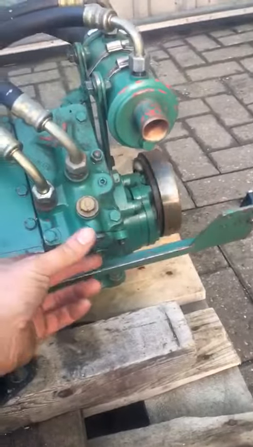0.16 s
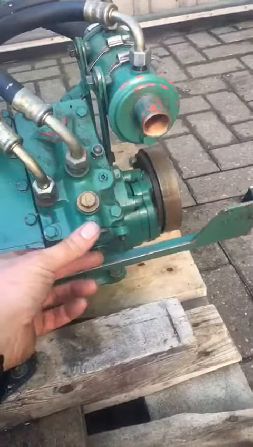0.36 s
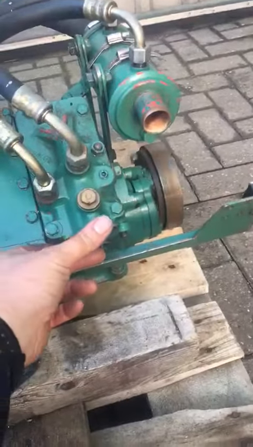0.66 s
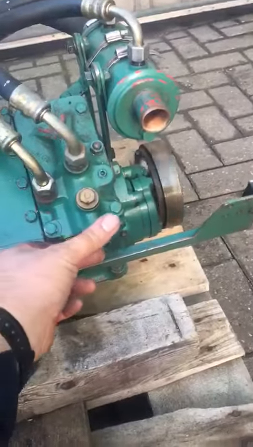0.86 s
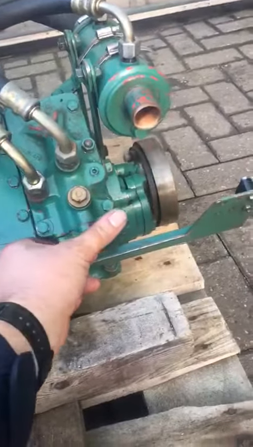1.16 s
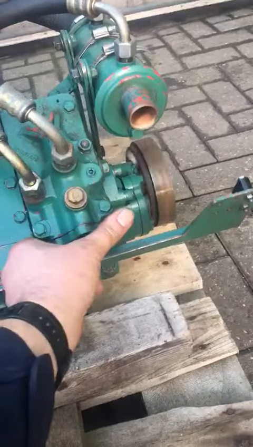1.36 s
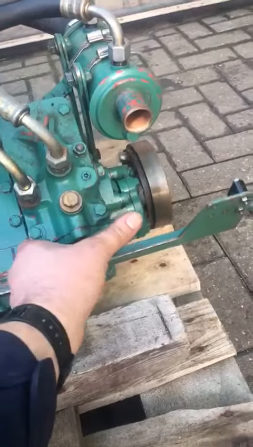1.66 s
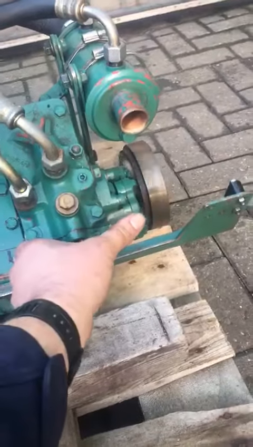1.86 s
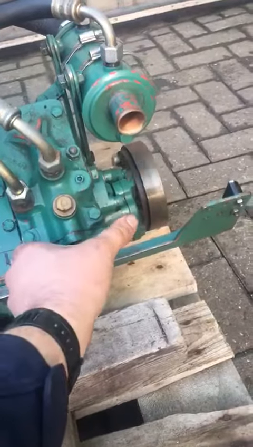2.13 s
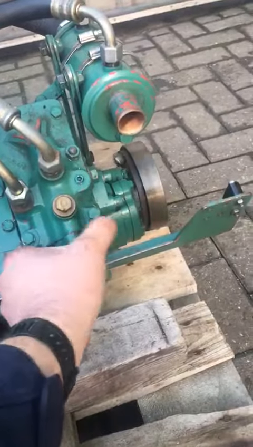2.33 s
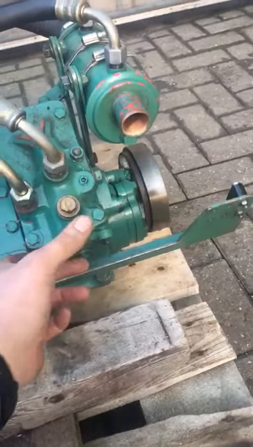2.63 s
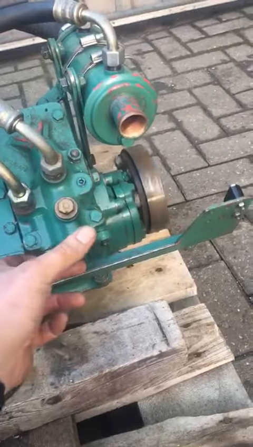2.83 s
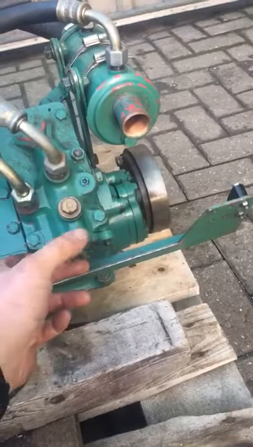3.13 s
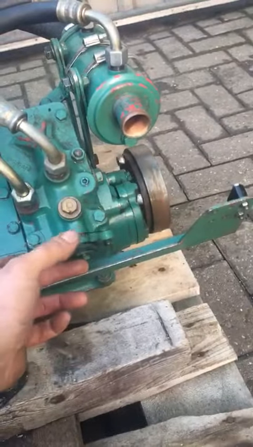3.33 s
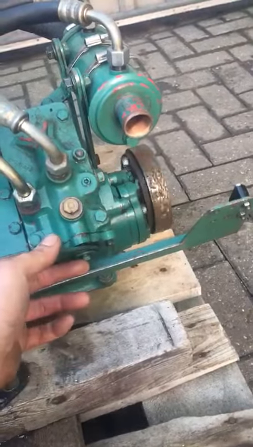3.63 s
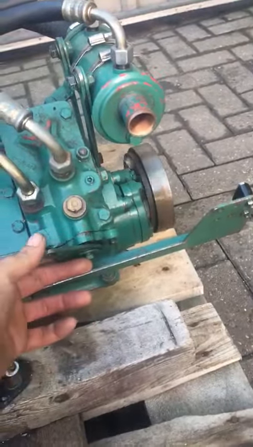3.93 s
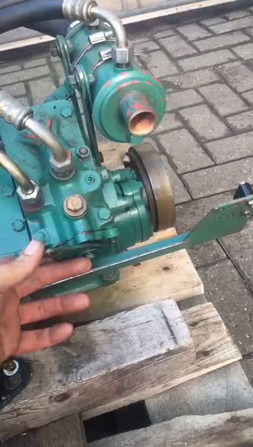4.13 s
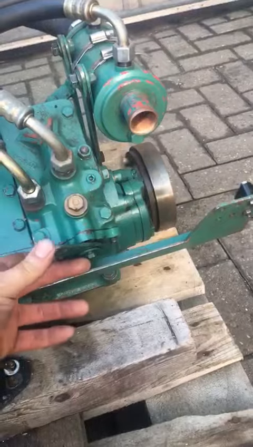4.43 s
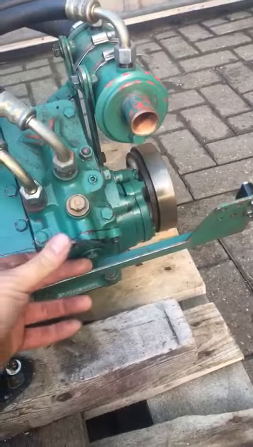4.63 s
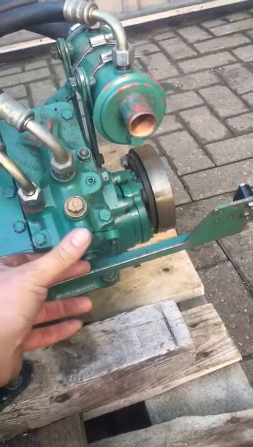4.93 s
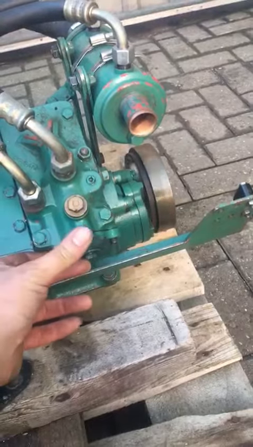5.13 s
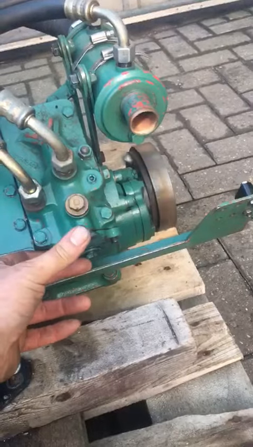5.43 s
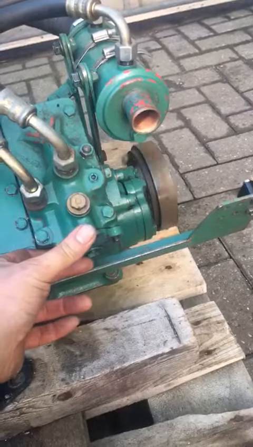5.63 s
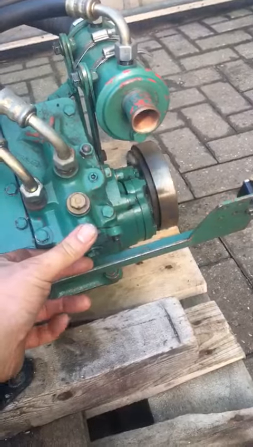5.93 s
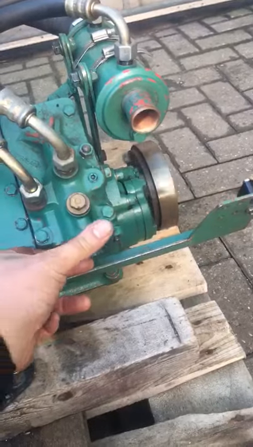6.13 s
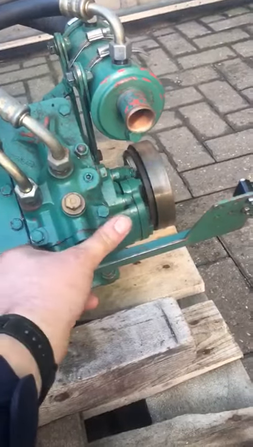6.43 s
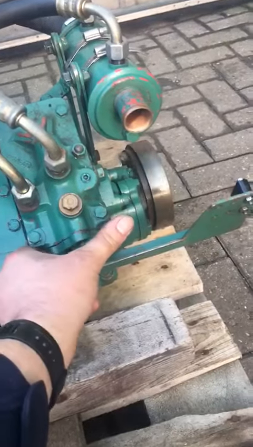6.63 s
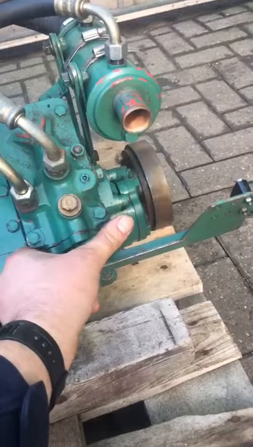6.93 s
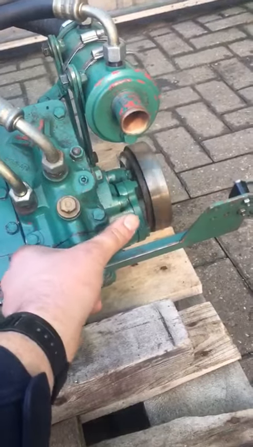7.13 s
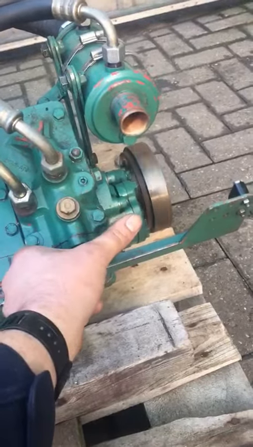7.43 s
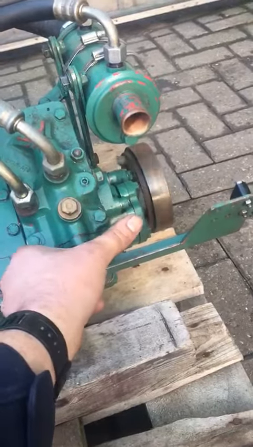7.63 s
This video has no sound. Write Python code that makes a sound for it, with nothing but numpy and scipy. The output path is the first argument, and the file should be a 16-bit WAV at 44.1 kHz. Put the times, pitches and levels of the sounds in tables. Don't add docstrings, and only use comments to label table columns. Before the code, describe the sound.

Continuous diesel clatter, close and dry outdoors: sharp combustion cracks, ringing head metal, a boxy crankcase shudder, ticking valves and tappets, and a throaty low exhaust throb. A hand works the gear lever, giving two quick thuds and a slight drop in speed with harsher knocking for about a second. Steady idle returns, then another, softer engagement slows it near the end. Small phone microphone, thin deep bass, blunted peaks.

```python
import sys
import numpy as np
from scipy import signal
from scipy.fft import rfft, irfft, next_fast_len
from scipy.io import wavfile
from scipy.ndimage import uniform_filter1d

SR = 44100
rng = np.random.default_rng(int(sys.argv[2]) if len(sys.argv) > 2 else 0)


def digitize_waveform(pressure):
    field = np.atleast_2d(pressure).T
    bounded = np.clip(field, -1, 1)
    quanta = np.round(bounded * 32767).astype(np.int16)
    wavfile.write(sys.argv[1], SR, quanta)


def amplitude_ratio(level_db):
    exponent = np.asarray(level_db, float) / 20
    return 10 ** exponent


N = 342657

# time in seconds, speed in firings per second.
SPEED = [(0.0, 27.488), (1.04, 27.355), (1.3, 27.995), (1.51, 25.091), (1.58, 25.989), (2.36, 26.427),
         (2.93, 27.611), (3.37, 27.02), (3.63, 28.067), (3.81, 26.603), (4.08, 27.503), (5.13, 27.864),
         (6.52, 28.003), (6.66, 25.382), (6.9, 26.288), (7.07, 25.857), (7.48, 27.443), (7.77, 27.162)]
FIRST_FIRING = 0.0436
# crack in dB, head ring in dB, crankcase in dB.
CYLINDERS = [(6, 4, 5), (1, 1.5, 2.5), (8.5, 3, 2.5), (3.5, 3, 3.5)]
# frequency in Hz, width in Hz, level in dB.
BLOCK = [(2080, 147, 3), (2444, 51, 2), (3230, 187, -3), (4647, 96, -2.5), (5546, 337, -2.5),
         (6220, 310, -1.5), (6720, 250, -2), (7200, 430, -6.5), (8980, 1080, -7), (10770, 230, -9)]


def unit(x):
    return x / np.sqrt(np.mean(x ** 2) + 1e-20)


def along(points, hz):
    point_hz, value = np.transpose(points)
    return np.interp(np.log(hz + 1), np.log(point_hz + 1), value)


def curves(rows):
    time_s, *columns = np.transpose(rows)
    return [np.interp(np.arange(N) / SR, time_s, column) for column in columns]


def filtered(x, response):
    size = next_fast_len(x.shape[-1] + SR // 2)
    spectrum = rfft(x, size) * response(np.fft.rfftfreq(size, 1 / SR))
    return irfft(spectrum, size)[..., :x.shape[-1]]


def resonance(hz, centre_hz, width_hz):
    return 1j * hz * width_hz / (centre_hz ** 2 - hz ** 2 + 1j * hz * width_hz)


def crank():
    return FIRST_FIRING + np.cumsum(curves(SPEED)[0]) / SR


def moments(lead):
    pump_early = np.array([0, .045, 0, 0])
    turned = crank()
    count = np.arange(1, int(turned[-1] + lead) + 1)
    cylinder = count % len(CYLINDERS)
    return np.searchsorted(turned, count - lead - np.array(pump_early)[cylinder]), cylinder


def bursts(at, db, rise_s, fall_s):
    shape = np.zeros(N)
    shape[at] = amplitude_ratio(db) * np.exp(1) * (1 + rise_s / fall_s)
    shape = signal.lfilter([1], [1, -np.exp(-1 / (fall_s * SR))], shape)
    soft = np.exp(-1 / (rise_s * SR))
    return signal.lfilter([1 - soft], [1, -soft], shape) * rng.standard_normal(N)


def ringing(modes, at, db, scatter_db, stagger_s, rise_s, fall_s):
    chance = rng.standard_normal((len(at), len(modes), 2))
    total = np.zeros(N)
    for k, (hz, width_hz, mode_db) in enumerate(modes):
        delay = (np.abs(stagger_s * chance[:, k, 1]) * SR).astype(int)
        struck = np.minimum(at + delay, N - 1)
        drive = bursts(struck, db + mode_db + scatter_db * chance[:, k, 0], rise_s, fall_s)
        total += filtered(drive, lambda f: resonance(f, hz, width_hz))
    return total


def load():
    governed, lag_s, dead_s = 27.99, 0.12, 0.08
    span = int(lag_s * SR) | 1
    sag = uniform_filter1d(governed - curves(SPEED)[0], span, origin=span // 2, mode="nearest")
    sag = np.pad(sag, (int(dead_s * SR), 0), "edge")[:N]
    knock_db = -28.5 + 1.11 * sag
    case_rel_db = -0.99 - 0.9 * sag
    exhaust_db = 0.2 * sag
    return knock_db, case_rel_db, exhaust_db


def surge(times_s):
    # time in seconds, extra level in dB.
    surges = [
        (1.572, 3),
        (6, .6),
        (1.5, -4),
        (1.879, 2.5),
        (6.735, 0.5),
        (8.2, 1),
    ]
    extra_db = np.zeros(len(times_s))
    for s, db in surges:
        extra_db[np.argmin(np.abs(times_s - s))] = db
    return extra_db


def exhaust():
    # frequency in Hz, width in Hz, lag in ms, then level in dB of cylinders 1, 2, 3, 4.
    pipe_modes = [(52.3, 39.6, 0.09, -32.5, -32.6, -33.1, -31.8),
                  (96.9, 107.7, 12.98, -37.8, -39.4, -41.8, -37.8),
                  (99.8, 22.6, -0.84, -36.7, -29.5, -70.0, -34.6),
                  (106.3, 10.0, -7.52, -35.2, -33.4, -70.0, -29.3),
                  (119.6, 27.2, 11.0, -38.0, -25.7, -23.5, -29.9),
                  (126.2, 28.8, 14.3, -30.9, -29.0, -29.8, -29.4),
                  (154.2, 13.0, -1.72, -30.3, -33.4, -32.8, -33.2),
                  (197.0, 41.5, -1.84, -40.9, -35.1, -54.3, -39.5),
                  (198.9, 40.3, 9.59, -54.6, -37.5, -32.3, -39.0),
                  (207.8, 19.1, 12.17, -36.8, -42.0, -34.1, -37.3),
                  (240.5, 18.8, 20.82, -36.5, -70.0, -70.0, -50.3),
                  (257.1, 19.3, 8.42, -36.2, -70.0, -70.0, -33.6)]
    # pitch factor, lag in ms.
    runners = [(1, 0), (1.063, .67), (1.134, -.33), (1.037, .39)]
    puff_hz = 450
    earlier = SR // 2
    before = FIRST_FIRING - np.arange(earlier, 0, -1) * SPEED[0][1] / SR
    turned = np.r_[before, crank()]
    count = np.arange(int(turned[0]), int(turned[-1]) + 1)
    at = np.searchsorted(turned, count)
    steady_db = 70.2 + 0.3 * rng.standard_normal(len(at))
    load_db = np.r_[np.zeros(earlier), load()[2]][at]
    size = amplitude_ratio(steady_db + load_db + surge((at - earlier) / SR))
    total = np.zeros(len(turned))
    for c, (pitch, runner_ms) in enumerate(runners):
        own = count % len(runners) == c
        pulses = np.zeros(len(turned))
        pulses[at[own]] = size[own]

        def pipe(f):
            response = 0
            for hz, width_hz, lag_ms, *db in pipe_modes:
                delay = np.exp(-2j * np.pi * f * (lag_ms + runner_ms) / 1000)
                response = response + amplitude_ratio(db[c]) * resonance(f, pitch * hz, width_hz) * delay
            return response

        total += filtered(pulses, pipe)
    return filtered(total, lambda f: np.exp(-(f / puff_hz) ** 2))[earlier:]


def knock():
    # time in seconds, peak in dB, head ring in dB re peak.
    hard_firings = [(0.3591, -10.5, -11), (1.0899, -9, -16), (1.5718, -4, -16), (1.6102, -8, -13),
                    (1.8786, -10.5, -9), (1.9924, -8, -18.5), (2.144, -8, -18), (2.2967, -12, -6),
                    (2.3715, -7.5, -19), (2.4483, -5.5, -18), (2.5232, -9, -15), (2.597, -12, -9),
                    (2.6713, -10, -11.5), (2.7447, -12.5, -6.5), (3.1088, -12, -14), (3.4037, -10.5, -13),
                    (3.5483, -6, -23), (3.8407, -10, -12), (3.9903, -6, -18.5), (4.2073, -9.5, -18.5),
                    (4.7157, -7.5, -19), (5.6486, -11.5, -11), (6.0776, -12.5, -10), (6.7356, -4.5, -13.5),
                    (6.8872, -9, -14), (7.0404, -9, -13), (7.1945, -10, -9.5), (7.2704, -8.5, -17),
                    (7.3447, -7, -18), (7.4919, -5.5, -22)]
    # frequency in Hz, density in dB per Hz.
    crack_spectrum = [(700, -36), (1500, -29), (2300, 8.5), (3000, -8), (4000, -3.5), (6500, -5.5),
                      (8500, -15.5), (11300, -5)]
    at, cylinder = moments(lead=0.14)
    chance = rng.standard_normal((len(at), 2))
    crack_db, head_db, _ = np.transpose(CYLINDERS)
    load_db = load()[0][at]
    db = load_db + crack_db[cylinder] - 6.5 + 2.2 * chance[:, 0]
    ring_db = load_db + head_db[cylinder] - 5.0 + 0.84 * chance[:, 1]
    for s, peak_db, ring_rel_db in hard_firings:
        k = np.argmin(np.abs(at / SR - s))
        db[k] = peak_db - 18.0 + 0.15 * crack_db[cylinder[k]]
        ring_db[k] = peak_db - 17 + 0.5 * (ring_rel_db + 16.0)
    sharp = amplitude_ratio(7.0) * bursts(at, db, rise_s=0.0007, fall_s=0.0014)
    shudder = bursts(at, db - 6.0, rise_s=0.001, fall_s=0.019)
    crack = filtered(sharp + shudder, lambda f: amplitude_ratio(along(crack_spectrum, f)))
    ring = ringing(BLOCK, at, ring_db + 12.5, scatter_db=3.0, stagger_s=0.0015, rise_s=0.00052, fall_s=0.0049)
    return crack + ring


def crankcase():
    # frequency in Hz, width in Hz, level in dB.
    case_modes = [(313, 220, -5), (608, 35, 2.5), (620, 64, -7), (984, 46, 0), (1080, 34, 2), (1248, 37, 2),
                  (1506, 57, 0.5), (1730, 87, -11)]
    at, cylinder = moments(lead=0.14)
    knock_db, case_rel_db, _ = load()
    cylinder_db = np.transpose(CYLINDERS)[-1][cylinder]
    db = (knock_db + case_rel_db)[at] + cylinder_db + 2.2 * surge(at / SR)
    return ringing(case_modes, at, db + 11.5, scatter_db=0.5, stagger_s=0.0025, rise_s=0.0027, fall_s=0.0049)


def rattle():
    # frequency in Hz, density in dB per Hz.
    rattle_spectrum = [(150, -4), (260, -9.5), (400, -8.5), (585, -3.5), (760, -10.5), (980, -4.5),
                       (1830, -12.5), (2370, -11.5), (4130, -20.5), (6590, -18.5), (11300, -29)]
    z = signal.stft(rng.standard_normal(N + 512), nperseg=256)[2]
    patches = uniform_filter1d(rng.standard_normal(z.shape), 4, 0)
    patches = uniform_filter1d(patches, 3, 1)
    noise = signal.istft(z * amplitude_ratio(2.9 * unit(patches)), nperseg=256)[1][:N]
    coloured = unit(filtered(noise, lambda f: amplitude_ratio(along(rattle_spectrum, f))))
    knock_db, case_rel_db, _ = load()
    return amplitude_ratio(-29.0 + 1.7 * (knock_db + case_rel_db + 29.0)) * coloured


def linkage():
    # place in firings into the cycle, frequency in Hz, width in Hz, level in dB.
    strikers = [(2.97, 1061, 61, -22.5), (.93, 962, 38, -25.5), (2.46, 600, 32, -27),
                (2.02, 620, 92, -25.5), (0.212, 570, 43, -30.5), (3.65, 346, 60, -26),
                (2.92, 790, 68, -29.5), (.22, 1290, 62, -28), (2.28, 1640, 62, -31.5), (1.9, 1270, 63, -27)]
    turned = crank()
    total = np.zeros(N)
    for place, hz, width_hz, db in strikers:
        at = np.searchsorted(turned, np.arange(place, turned[-1], len(CYLINDERS)))
        blow_db = db + 3.05 * rng.standard_normal(len(at))
        blows = np.zeros(N)
        blows[at] = amplitude_ratio(blow_db) * SR / (2 * np.pi * width_hz)
        total += filtered(blows, lambda f: resonance(f, hz, width_hz) * resonance(f, hz, 4.0 * width_hz))
    return amplitude_ratio(1.5) * total


def valves():
    at, _ = moments(lead=-0.03)
    db = load()[0][at] + 5.4 * rng.standard_normal(len(at))
    return ringing(BLOCK[2:], at, db - 1.0, scatter_db=2.0, stagger_s=0.0045, rise_s=0.00048, fall_s=0.0015)


def tappets():
    at, _ = moments(lead=0.289)
    db = load()[0][at] + 3.0 * rng.standard_normal(len(at))
    return ringing(BLOCK[1::2], at, db - 8.5, scatter_db=7.5, stagger_s=0.0054, rise_s=0.0004, fall_s=0.002)


def gearbox():
    # time in seconds, level in dB.
    bites = [
        (1.574, -28),
        (1.803, -27),
        (6.7, -33),
    ]
    # frequency in Hz, width in Hz, level in dB.
    casing_modes = [(68, 36, 4), (796, 85, 2), (1050, 70, -2)]
    blows = np.zeros(N)
    for s, db in bites:
        blows[round(s * SR)] = amplitude_ratio(db)

    def casing(f):
        response = 0
        for k, (hz, width_hz, db) in enumerate(casing_modes):
            gain = (-1) ** k * amplitude_ratio(db) * SR / (np.pi * width_hz)
            response = response + gain * resonance(f, hz, width_hz)
        return response

    return filtered(blows, casing)


def scene():
    metal = knock() + crankcase() + linkage() + valves() + tappets() + gearbox()
    ground = np.pad(metal, (130, 0))[:N]
    return (exhaust() + metal + amplitude_ratio(-18.5) * ground + rattle())[None]


def edge(x):
    edge_hz, wander_hz = 11750, 230
    hz, t, z = signal.stft(x, SR, nperseg=1024)
    steps = np.repeat(rng.standard_normal(len(t)), 4)[:len(t)]
    over_hz = np.clip(hz[:, None] - (edge_hz + wander_hz * steps), 0, 200)
    return signal.istft(z * amplitude_ratio(-0.4 * over_hz), SR, nperseg=1024)[1][..., :N]


def low_pass(x):
    return signal.sosfilt(signal.butter(12, 12840, fs=SR, output="sos"), x)


def record(dry):
    bass_cut_hz, top_hz, ceiling = 45.1, 11650, 0.97

    def bass(f):
        s = 1j * f
        return (s ** 2 / (s ** 2 + s * bass_cut_hz + bass_cut_hz ** 2)) ** 3

    heard = filtered(dry, bass)
    heard = heard / (1 + np.abs(heard / ceiling) ** 8) ** (1 / 8)
    heard = filtered(heard, lambda f: amplitude_ratio(-0.008 * np.maximum(f - top_hz, 0)))
    return low_pass(edge(heard))


dry = scene()
out = record(dry)
digitize_waveform(out)
```